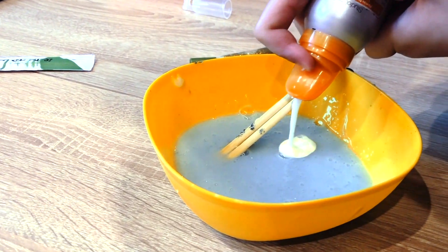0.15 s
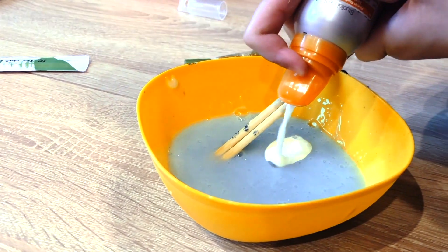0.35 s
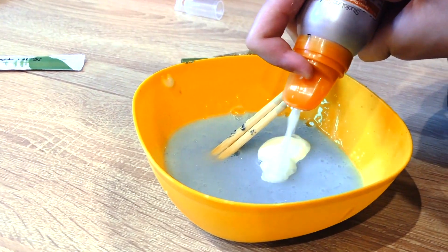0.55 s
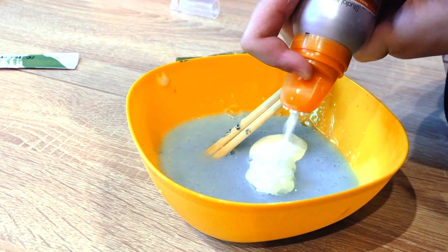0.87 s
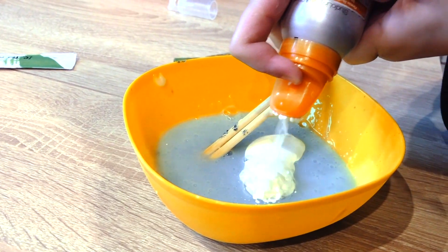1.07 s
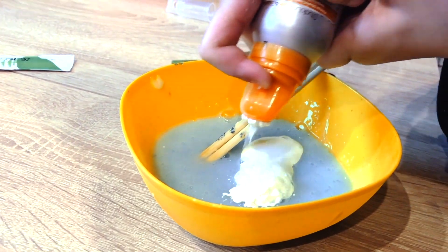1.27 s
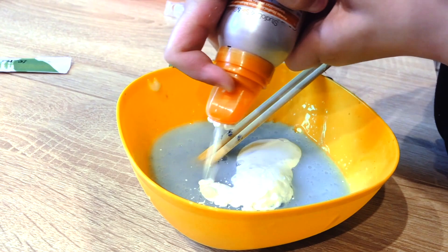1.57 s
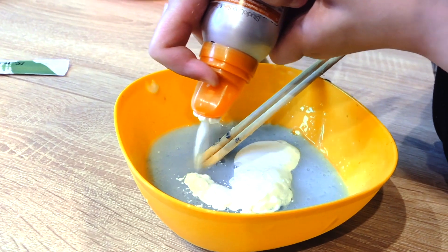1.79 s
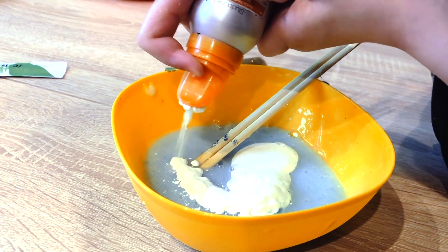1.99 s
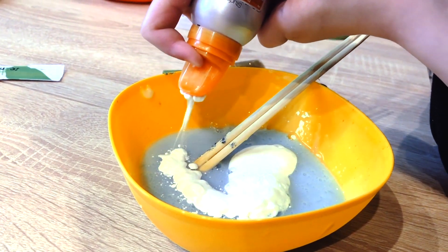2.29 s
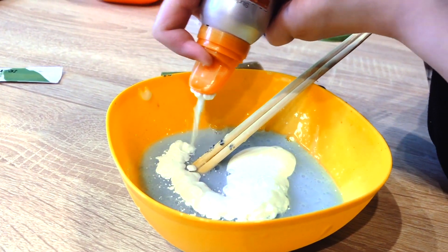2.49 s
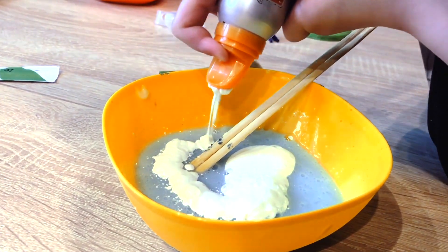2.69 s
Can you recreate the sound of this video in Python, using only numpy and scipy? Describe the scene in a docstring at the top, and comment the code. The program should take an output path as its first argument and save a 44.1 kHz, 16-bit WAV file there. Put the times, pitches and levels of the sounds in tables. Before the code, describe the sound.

An aerosol can squirts foam into a plastic bowl, soft leak bursting into loud sputtering hiss

```python
"""An aerosol can squirts foam into a plastic bowl of liquid on a table, close to the microphone.
The valve first leaks a soft hiss, then opens: gas pockets burst at the nozzle in a dense sputter over
a rushing jet and the splatter of foam. The hollow between hand, can and bowl colours it as the can moves."""
import sys
import numpy as np
from scipy import signal
from scipy.fft import rfft, irfft
from scipy.io import wavfile

SR = 44100
rng = np.random.default_rng(int(sys.argv[2]) if len(sys.argv) > 2 else 0)


def transcribe(u):
    """Save the signal u as a 16-bit wav file named by the first command-line argument.

    u: samples, shape (n,) or (channels, n), limited to [-1, 1]; the rate is SR.
    q: integer samples, one column per channel.
    """
    v = np.clip(np.atleast_2d(u).T, -1, 1)
    q = np.round(v * 32767).astype(np.int16)
    wavfile.write(sys.argv[1], SR, q)


N = 125685

# flow through the open valve (s, splatter dB, sputter dB, fizz dB)
FLOW = [(0.54, -36.5, -46, -45), (0.57, -36.5, -36, -44), (0.61, -30.5, -25.5, -52),
        (0.72, -33, -29.5, -34.5), (0.82, -32, -22.5, -29), (0.95, -30, -22, -26.5),
        (1.1, -31, -23.5, -22.5), (1.25, -31, -24, -28.5), (1.45, -31, -24, -23),
        (1.65, -31, -24, -25), (1.8, -31, -24.5, -23), (2.0, -31, -23.5, -23),
        (2.13, -32, -23, -28), (2.3, -30.5, -23, -23), (2.42, -32, -23, -30.5),
        (2.57, -31, -23, -26), (2.7, -30.5, -25, -23.5), (2.84, -30.5, -21, -25)]
OPEN_S, OPEN_RISE_S = 0.532, 0.0088
# the largest gas pockets (s, peak dB, pitch Hz)
SPITS = [(0.5442, -22, 7290), (0.5526, -15, 4000), (0.5881, -13, 7140), (0.617, -8.5, 6540), (0.6869, -10.5, 4700),
         (0.7224, -9, 3800), (0.7687, -6.5, 6540), (0.7946, -5, 5030), (0.8229, -6, 4840), (0.8305, -3, 5080),
         (0.8789, -7, 4540), (0.8849, -2, 6560), (0.9468, -3, 5860), (0.9774, -8, 4760), (1.0122, -6, 6520),
         (1.0174, -4, 8200), (1.1388, -4, 7080), (1.1504, -6, 4220), (1.2039, -6, 4180), (1.2441, -2, 4400),
         (1.2626, -5, 4120), (1.298, -4, 6530), (1.3603, -7, 4200), (1.4112, -4, 4050), (1.4516, -3, 7080),
         (1.4584, -3, 9690), (1.5295, -6, 4870), (1.5609, -3.5, 6930), (1.5933, -5, 8180), (1.6806, -1, 10200),
         (1.7124, -7, 4780), (1.72, 1, 9260), (1.7475, -4, 6370), (1.7524, -3, 6040), (1.7893, -2, 6000),
         (1.8393, -5.5, 5400), (1.8677, -4, 6070), (1.8814, -1, 6150), (2.0168, -4, 7640), (2.2358, -11, 7670),
         (2.2548, -9, 8430), (2.2962, -4, 4930), (2.3506, -8, 5040), (2.403, -6.5, 7750), (2.4593, -8, 4770),
         (2.4793, -1, 9610), (2.5292, -2, 4800), (2.5476, -2, 7400), (2.5686, -8, 6290), (2.599, -6, 5010),
         (2.6589, -4, 5300), (2.6719, -2, 5320), (2.6933, -3, 10600), (2.7237, -4, 4910), (2.7457, -3, 10500),
         (2.7671, -4, 5230), (2.7824, -4, 5380), (2.8076, -7, 6630), (2.829, -5, 4920)]  # fixed
SPIT_SWELL_S, SPIT_RISE_S, SPIT_WIDTH_HZ, SPIT_LOW_HZ = .0007, 0.0004, 3200, 2200
SPIT_MIST_DB = 18.5
# foam briefly plugs the nozzle (s, length s)
CLOGS = [(1.523, 0.014), (1.675, 0.013), (1.73, 0.028), (2.011, 0.011), (2.508, 0.024), (2.634, 0.017)]
CLOG_DB = -4.5
# soft plops of foam before the jet starts (s, level dB)
PLOPS = [(0.185, -58), (0.206, -44), (.232, -55), (0.295, -46), (.404, -41), (.415, -39.5), (0.51, -45)]
PLOP_DECAY_S = 0.006
# spectra (Hz, dB per Hz)
PLOP_COLOUR = [(60, -15), (200, 5.5), (600, -5.5), (1150, 1), (1550, -13), (2500, -6.5), (5500, -6.5), (8000, -19), (15000, -28)]
LEAK_COLOUR = [(30, -13), (150, 0), (400, -1), (800, -9), (1170, 3), (1450, -9), (1800, 0), (2350, 4), (2800, -3.5), (3550, -6), (4050, 2.5), (4400, -4), (4900, -1), (6400, -3.5), (7300, -9), (8200, -2), (9000, -2), (9500, -2.5), (10000, 2), (12000, -10), (13000, -7), (16000, -16)]
SPLAT_COLOUR = [(25, -50), (60, -42), (100, -16), (150, -9), (200, 0), (400, 1.5), (850, -0.5), (1100, -0.5), (1300, 3.5), (1500, -14), (2200, -6), (4000, -7), (16000, -78)]
SPUTTER_COLOUR = [(30, -34), (700, -18), (1200, -4), (1500, -11.5), (2100, -6.5), (3000, -5.5), (3500, -6), (4200, -1), (5000, 1.5), (5450, -2), (6100, -1), (7000, -1.5), (8000, -7.5), (16000, -31)]
FIZZ_COLOUR = [(500, -56), (5000, -7), (7300, -13.5), (8300, 2.5), (10500, 0), (12000, -2), (14000, -2), (16000, -6.5)]
LEAK_DB, SPLAT_DB, SPUTTER_DB, FIZZ_DB = -48.5, 0.5, -1.5, -5
# resonances (+) and cancellations (-) of the hollow round the nozzle: width Hz, then its path (s, centre Hz, lift dB)
HOLLOW = [
    (534, [(.8, 2200, -0.5), (1.4, 1910, 3.5), (2.0, 1600, 8), (2.35, 1650, 12), (2.55, 1760, 15), (2.68, 1830, 20.5), (2.85, 1880, 16)]),
    (574, [(.54, 3070, 13), (.65, 3140, 8), (.9, 2820, -5.5), (1.45, 2900, 8.5), (2.1, 2510, 6.5), (2.35, 2470, 5), (2.56, 2880, -3), (2.7, 2490, 8.5)]),
    (705, [(.6, 4500, 5.5), (.85, 4700, 5.5), (1.25, 4200, 3), (1.6, 4830, 0), (2.3, 5100, -1), (2.55, 5140, 4), (2.8, 5200, 0)]),
    (900, [(.85, 6550, 3), (1.15, 5940, 4.5), (1.5, 7500, 4.5), (1.8, 6100, 2), (2.05, 7200, 4), (2.27, 8200, 10), (2.42, 7900, 1), (2.56, 7850, 7), (2.7, 8200, -2.5)]),
    (880, [(1.1, 11400, 6), (1.7, 9700, 1.5), (1.95, 9000, 3.5), (2.25, 9100, 3.5), (2.5, 9800, 4.5), (2.72, 11000, 3)]),
    (380, [(.6, 1900, -12), (1.0, 1780, -9), (1.3, 2230, 0.5), (1.6, 2200, -6), (2.0, 1980, -8), (2.35, 2100, -4), (2.52, 2480, -6), (2.75, 3080, 0.5)]),
    (560, [(.6, 3510, -9), (1.15, 3680, -5.5), (1.52, 3480, -7.5), (1.85, 3630, -1), (2.05, 4150, -12), (2.25, 3920, -13), (2.5, 3960, -1), (2.75, 4260, -12)])]
# small gas pockets, and the share of plain jet noise in sputter and fizz
POPS_PER_S, POP_SPREAD_DB, POP_RING_S = 1800, 5, 0.00041
JET_SHARE_DB, FIZZ_JET_DB = 3, -2.5
# echoes from liquid, bowl wall and hand as the can moves: one path each (s, delay ms, gain)
ECHOES = [
    [(.6, 0.48, -0.28), (1.1, 0.64, -0.09), (1.5, 0.57, -0.12), (2.3, 0.53, -0.19), (2.55, 0.44, -0.092)],
    [(.6, 0.95, 0.17), (1.2, 1.06, 0.21), (1.55, 0.93, 0.14), (2.0, 1.23, 0.064), (2.4, 1.2, 0.24), (2.8, 1.2, 0.067)],
    [(.7, 0.75, -0.004), (1.0, 0.87, -0.18), (1.55, 0.86, -0.21), (1.8, 0.94, -0.1), (2.3, 0.89, -0.076), (2.8, 0.99, -0.0044)],
    [(.6, 1.62, 0.12), (1.25, 1.45, 0.11), (1.8, 1.73, 0.2), (2.4, 1.49, 0.2), (2.85, 1.3, 0.083)]]
ROOM_DB, ROOM_T60_S = -13, 0.11
EDGE_HZ = 15950  # fixed
TIME = np.arange(N) / SR
BOWL_HZ, BOWL_WIDTH_HZ, BOWL_DB = 1087, 84, 4.5  # the air in the bowl rings under the splatter
LIMIT = 1.0  # fixed
# the uneven train of bursts in the nozzle, and the steady flow between them (gain)
BURSTS_PER_S, BURST_SPREAD_DB, BURST_RISE_S, BETWEEN_BURSTS = 210, 4.0, .00048, .36
FIZZ_STEADY_DB, FIZZ_OWN_DB = -18.5, 4.5
PUFF_RMS_DB = -7.5  # fixed


def amp(db):
    """Decibels to gain."""
    return 10 ** (np.asarray(db) / 20)


def unit(x):
    """Scales to rms 1."""
    return x / np.sqrt(np.mean(x ** 2) + 1e-20)


def curve(rows, axis=1):
    """One column of a timed table, for every sample."""
    rows = np.array(rows)
    return np.interp(TIME, rows[:, 0], rows[:, axis])


def add(mix, s, sound):
    """Mixes a sound in at time s."""
    part = mix[round(s * SR):][:len(sound)]
    part += sound[:len(part)]


def colour(x, points):
    """Causal filter of unit energy with the given spectrum."""
    size = 4096  # fixed
    hz, db = np.transpose(points)
    log_gain = np.log(amp(np.interp(np.log(abs(np.fft.fftfreq(size, 1 / SR)) + 1), np.log(hz), db)))
    taps = np.fft.ifft(np.exp(np.conj(signal.hilbert(log_gain)))).real[:size // 2]
    return signal.fftconvolve(x, taps / np.linalg.norm(taps))[:N]


def resonate(x, hz, width_hz):
    """A resonance of gain 1 that follows the curve hz."""
    turn, r = np.exp(2j * np.pi * np.cumsum(hz) / SR), np.exp(-np.pi * width_hz / SR)
    return 2 * (turn * signal.lfilter([1 - r], [1, -r], x / turn + 1e-18)).real


def flutter(lo_hz, hi_hz):
    """Random unevenness of rms 1 between two rates."""
    hz = np.fft.rfftfreq(N, 1 / SR)
    return unit(irfft(rfft(rng.standard_normal(N)) * hz ** 2 / (hz ** 2 + lo_hz ** 2) / (1 + (hz / hi_hz) ** 2), N))


def pop(hz, ring_s, rough, rise_s):
    """One gas pocket: a brief ring and a puff, peak 1."""
    t = TIME[:SR // 100]  # fixed
    wave = np.sin(2 * np.pi * hz * t) + rough * rng.standard_normal(len(t))
    wave *= (1 - np.exp(-t / rise_s)) * np.exp(-t / ring_s)
    return wave / abs(wave).max()


def crackle(lo_hz, hi_hz, surge, count=24):
    """Small pockets of many pitches and sizes; they crowd together in each surge."""
    sizes = amp(POP_SPREAD_DB * np.minimum(rng.exponential(1, N), 3.2)) * rng.choice([-1, 1], N)
    clicks = sizes * (rng.random(N) < POPS_PER_S / SR * surge / surge.mean())
    kind = rng.integers(0, count, N)
    return unit(sum(signal.oaconvolve(clicks * (kind == k), pop(hz, POP_RING_S, rough=0.56, rise_s=.00008))[:N]
                    for k, hz in enumerate(np.linspace(lo_hz, hi_hz, count))))


def jet():
    """The open valve: sputter and fine fizz surge together, over foam splattering into the bowl."""
    opening = np.clip((TIME - OPEN_S) / OPEN_RISE_S, 0, 1)
    surge = surges()
    sputter = crackle(2380, 8850, surge ** 2) + amp(JET_SHARE_DB) * unit(surge * rng.standard_normal(N))
    mist = surge * amp(FIZZ_OWN_DB * flutter(lo_hz=40.4, hi_hz=320))
    fizz = (crackle(8080, 15100, mist) + amp(FIZZ_JET_DB) * unit(mist * rng.standard_normal(N))
            + amp(FIZZ_STEADY_DB) * rng.standard_normal(N) + spit_mist())
    spray = (amp(SPUTTER_DB + curve(FLOW, axis=2)) * unit(colour(sputter, SPUTTER_COLOUR))
             + amp(FIZZ_DB + curve(FLOW, axis=3)) * unit(colour(fizz, FIZZ_COLOUR)))
    lumps = surge ** 0.33 * amp(2.42 * flutter(lo_hz=25, hi_hz=123)) * rng.standard_normal(N)
    ringing = amp(BOWL_DB) * resonate(lumps, np.full(N, BOWL_HZ), BOWL_WIDTH_HZ)
    splatter = amp(SPLAT_DB + curve(FLOW)) * unit(colour(lumps + ringing, SPLAT_COLOUR))
    return bowl(opening * clogs() * spray) + opening * splatter


def spits():
    """Large pockets blow out of the nozzle: each a rough puff of about two milliseconds round its own pitch."""
    out, t = np.zeros(N), TIME[:SR // 100]  # fixed
    puff = t / SPIT_RISE_S * np.exp(1 - t / SPIT_RISE_S)
    for s, db, hz in SPITS:
        pitch = np.full(len(t), hz)
        wave = puff * resonate(resonate(rng.standard_normal(len(t)), pitch, SPIT_WIDTH_HZ), pitch, SPIT_WIDTH_HZ)
        add(out, s + SPIT_SWELL_S, amp(PUFF_RMS_DB + db) * wave * np.linalg.norm(puff) / np.linalg.norm(wave))
    return signal.sosfilt(signal.butter(2, SPIT_LOW_HZ, "high", fs=SR, output="sos"), out)


def leak():
    """The barely open valve hisses softly while the first foam plops out."""
    hiss = amp(LEAK_DB + 2.0 * flutter(lo_hz=2.6, hi_hz=91.5)) * unit(colour(rng.standard_normal(N), LEAK_COLOUR))
    puffs = np.zeros(N)
    for s, db in PLOPS:
        add(puffs, s, amp(db) * np.exp(-TIME[:SR // 10] / PLOP_DECAY_S))
    return hiss + colour(puffs * rng.standard_normal(N), PLOP_COLOUR)


def bowl(x):
    """Quick echoes from liquid, wall and hand, then the colour of the hollow."""
    return hollow(x + sum(curve(path, axis=2) * np.interp(TIME - curve(path) / 1000, TIME, x, left=0) for path in ECHOES))  # fixed


def room(x):
    """The short diffuse tail of a small room."""
    t = TIME[:SR // 2]
    tail = rng.standard_normal(len(t)) * np.minimum(t / 0.0017, 1) * np.exp(-np.log(1000) * t / ROOM_T60_S)
    return x + amp(ROOM_DB) * signal.fftconvolve(x, tail / np.linalg.norm(tail))[:N]


def surges(count=1500):
    """Gas and foam take turns in the nozzle: an uneven train of short bursts over a weaker steady flow."""
    gaps, sizes = rng.gamma(2, .5, count), np.minimum(rng.standard_normal(count), 1.4)
    at = (np.cumsum(gaps) / BURSTS_PER_S * SR).astype(int)
    starts = np.bincount(at[at < N], amp(BURST_SPREAD_DB * sizes[at < N]), N)
    t = TIME[:SR // 50] / BURST_RISE_S  # fixed
    return np.sqrt(BETWEEN_BURSTS ** 2 + abs(signal.oaconvolve(starts ** 2, (t * np.exp(1 - t)) ** 2)[:N]))


def hollow(x):
    """Resonances and cancellations glide as the can moves: causal bumps on short-time spectra."""
    hz, t, z = signal.stft(x, SR, nperseg=512, noverlap=384, return_onesided=False)  # fixed
    db = 0
    for width, path in HOLLOW:
        s, centre, lift = np.transpose(path)
        db = db + np.interp(t, s, lift) * .5 ** ((2 * (abs(hz)[:, None] - np.interp(t, s, centre)) / width) ** 2)
    z = z * np.exp(np.conj(signal.hilbert(np.log(amp(db)), axis=0)))
    return signal.istft(z, SR, nperseg=512, noverlap=384, input_onesided=False)[1].real[:N]  # fixed


def spit_mist():
    """Each large pocket also throws a burst of fine mist."""
    out, t = np.zeros(N), TIME[:SR // 100] / SPIT_RISE_S  # fixed
    for s, db, _ in SPITS:
        add(out, s + SPIT_SWELL_S, amp(SPIT_MIST_DB + db) * t * np.exp(1 - t))
    return out * rng.standard_normal(N)


def clogs():
    """Gain of the gas flow: it sags while foam plugs the nozzle."""
    return amp(CLOG_DB * sum(np.exp(-(2 * (TIME - s) / length) ** 2) for s, length in CLOGS))


def scene():
    """Leak, jet and spits in the room."""
    return room(leak() + jet() + bowl(spits()))[None]


def record(dry):
    """The highest peaks are rounded off; then the band limit."""
    rounded = dry / (1 + (dry / LIMIT) ** 6) ** (1 / 6)  # fixed
    return signal.oaconvolve(rounded, signal.firwin(511, EDGE_HZ, window=("kaiser", 9), fs=SR)[None], "same")


dry = scene()
out = record(dry)
transcribe(out)
```